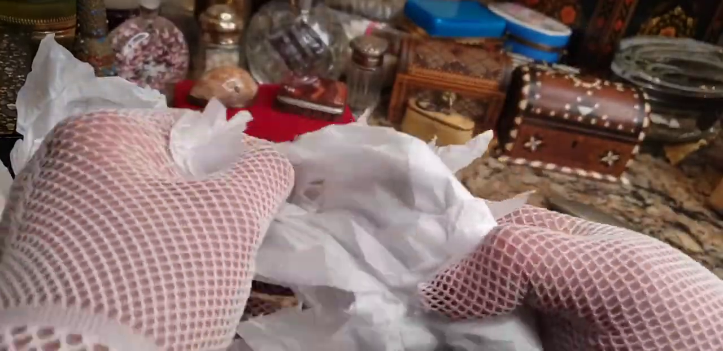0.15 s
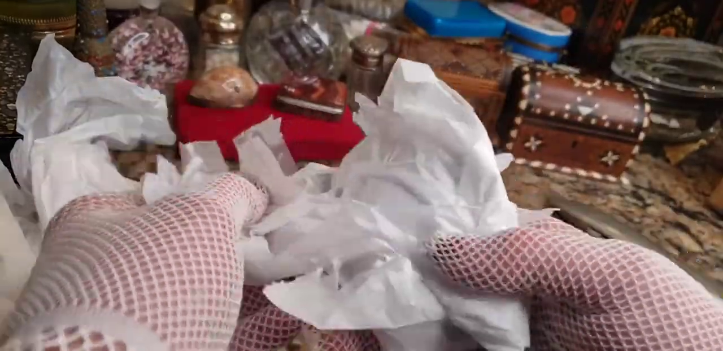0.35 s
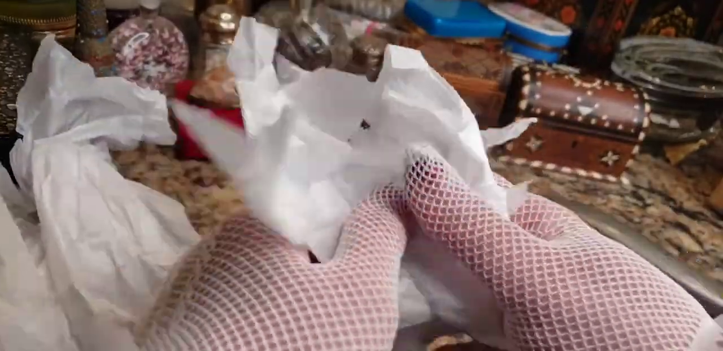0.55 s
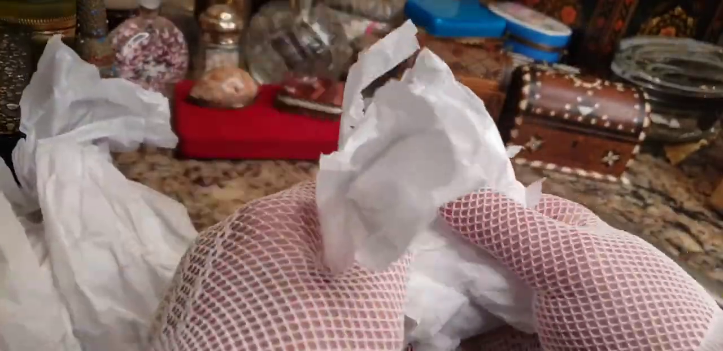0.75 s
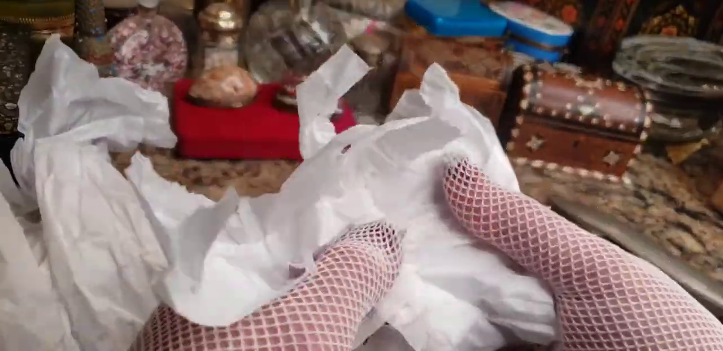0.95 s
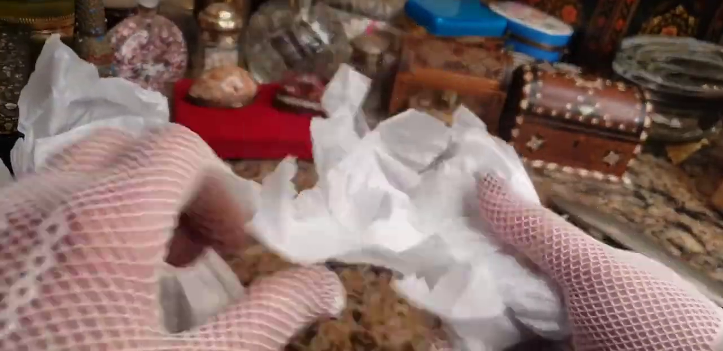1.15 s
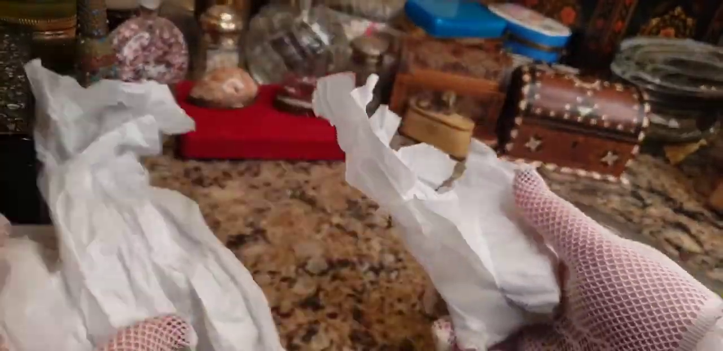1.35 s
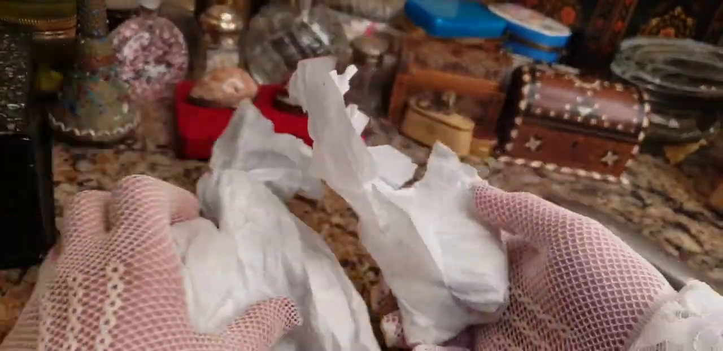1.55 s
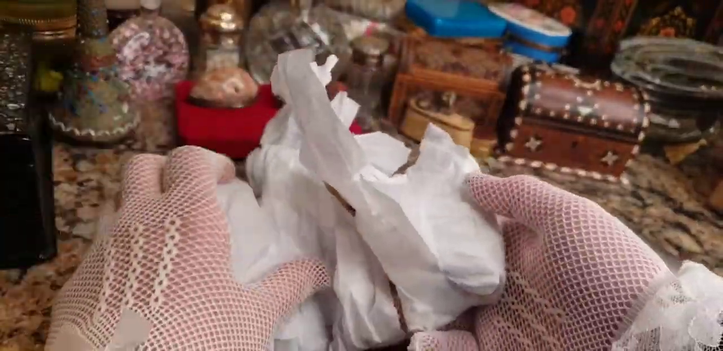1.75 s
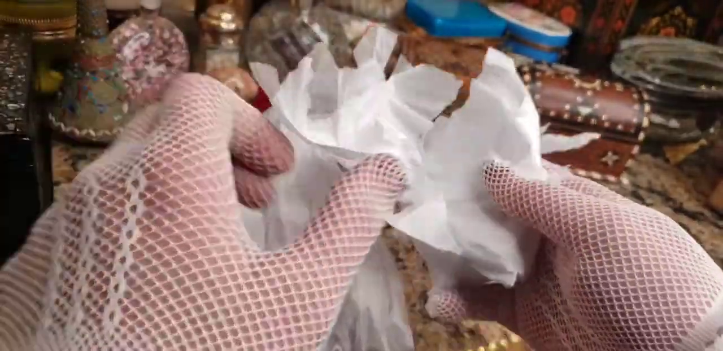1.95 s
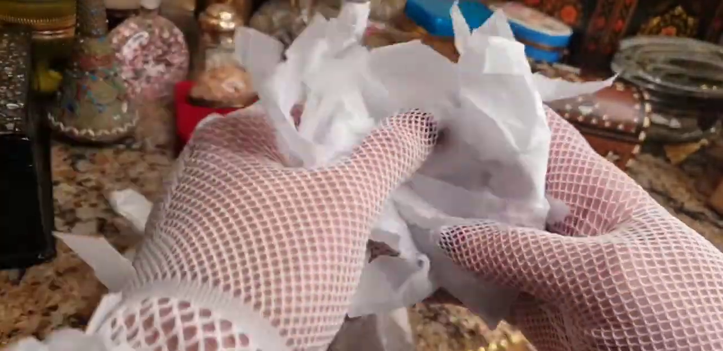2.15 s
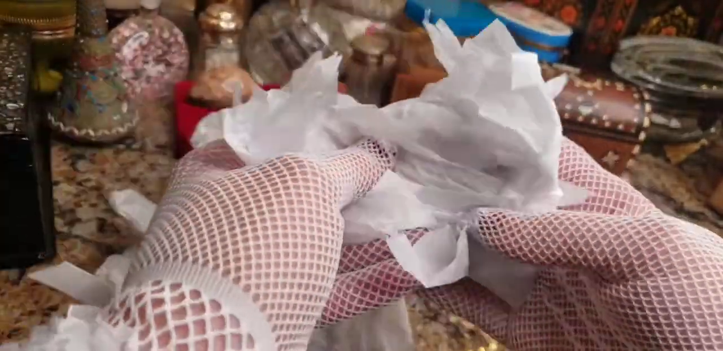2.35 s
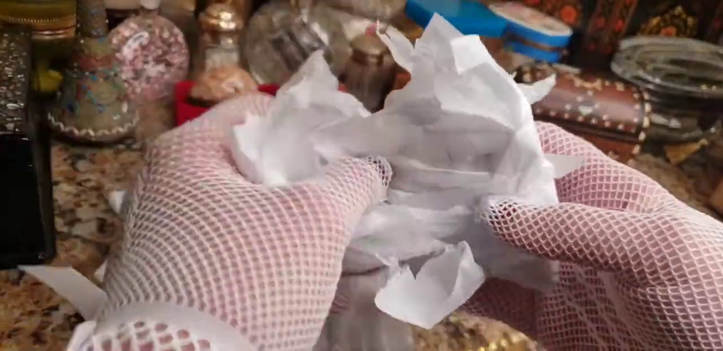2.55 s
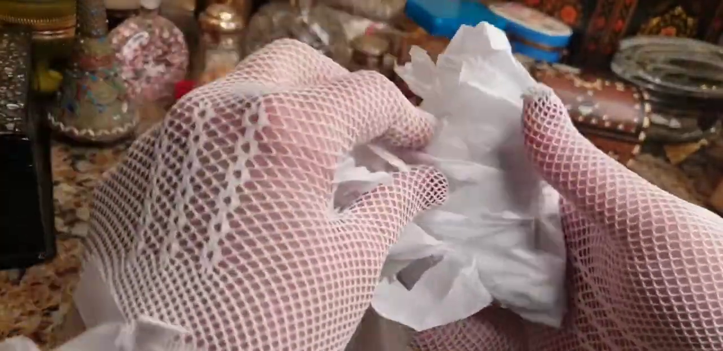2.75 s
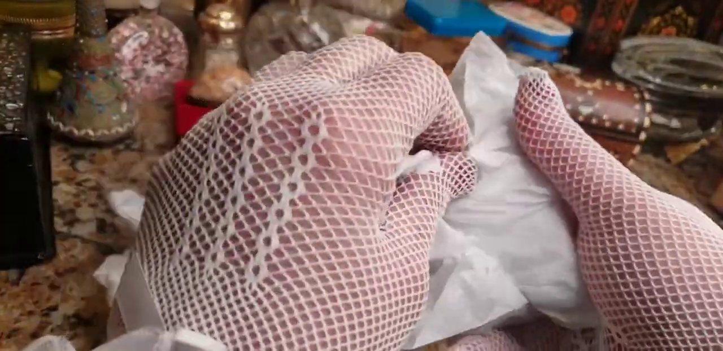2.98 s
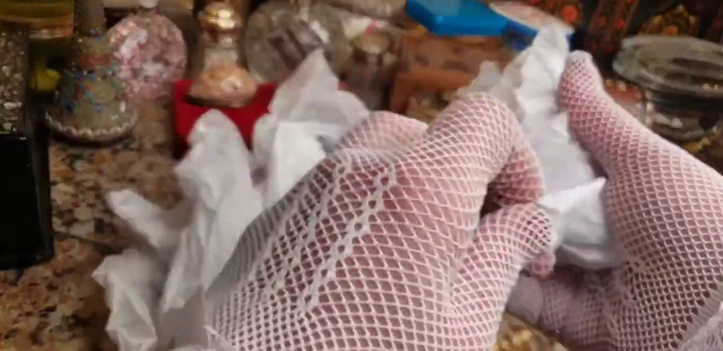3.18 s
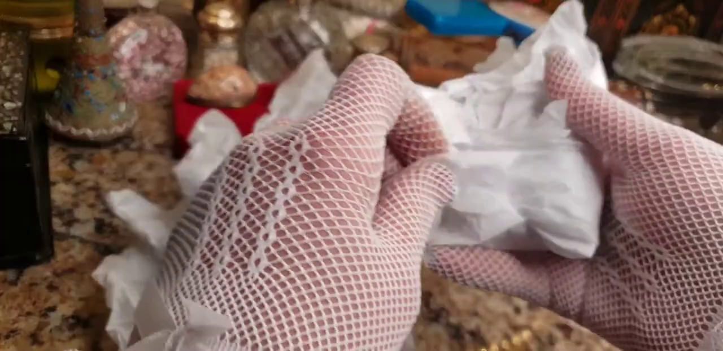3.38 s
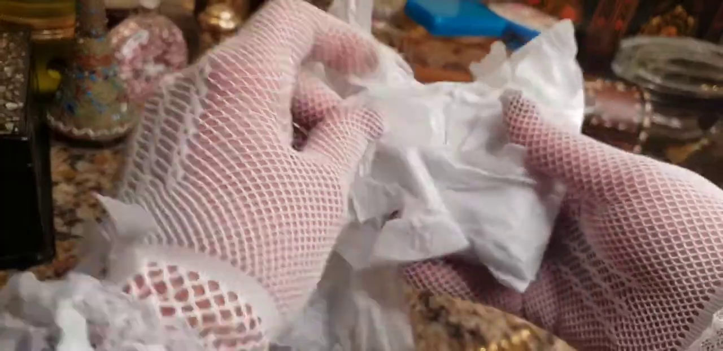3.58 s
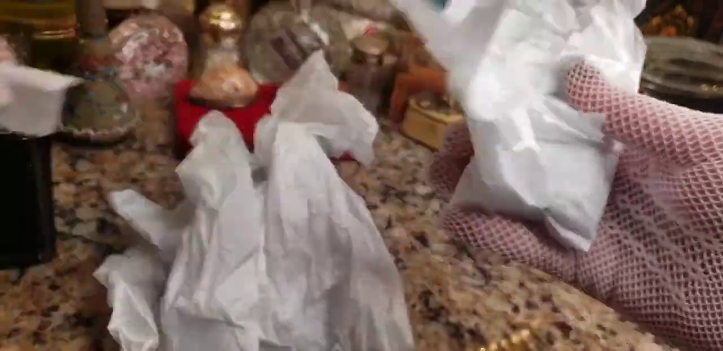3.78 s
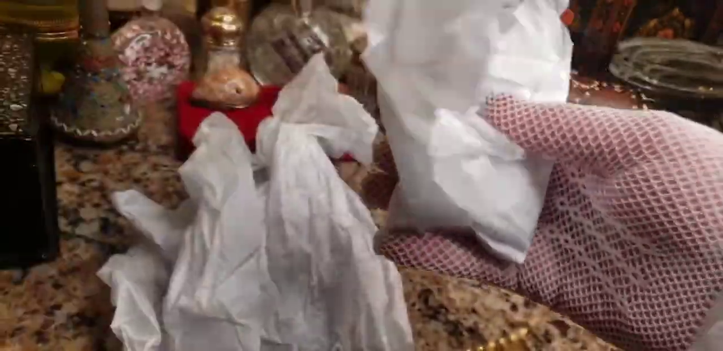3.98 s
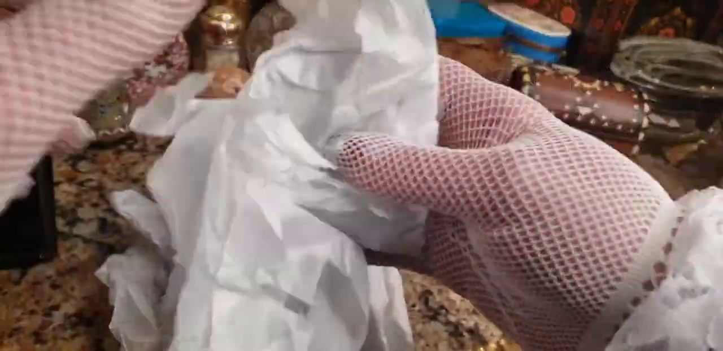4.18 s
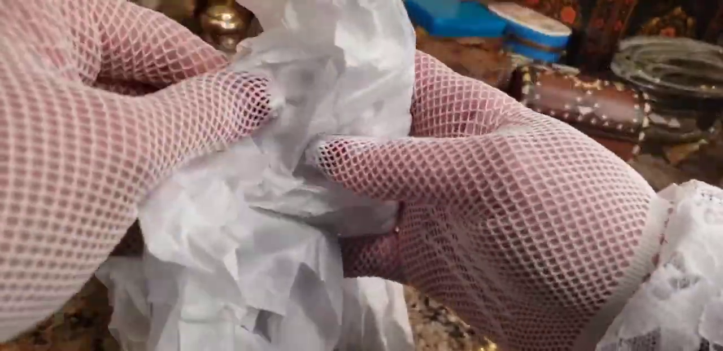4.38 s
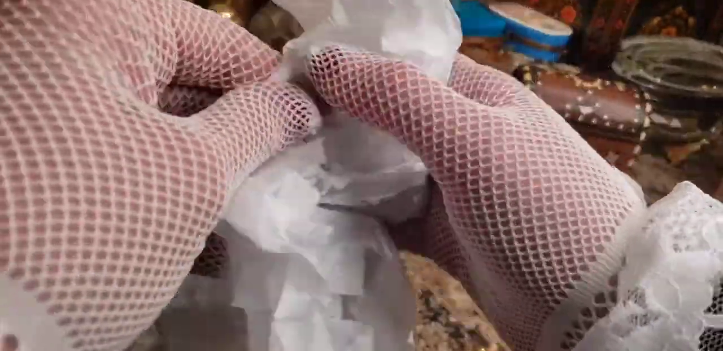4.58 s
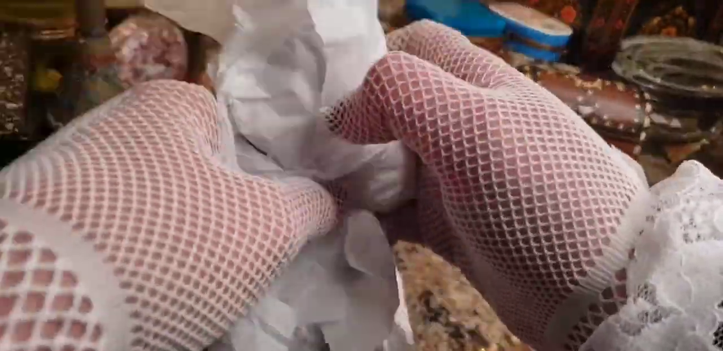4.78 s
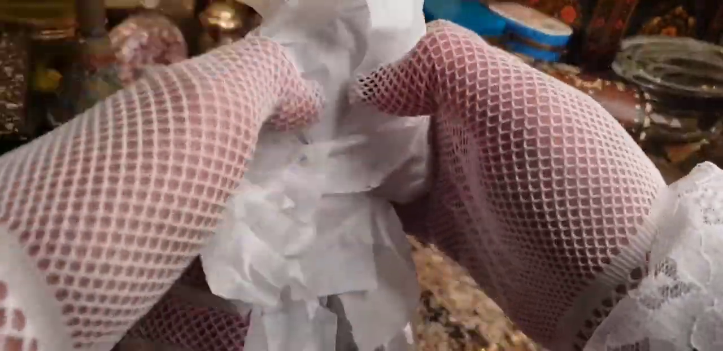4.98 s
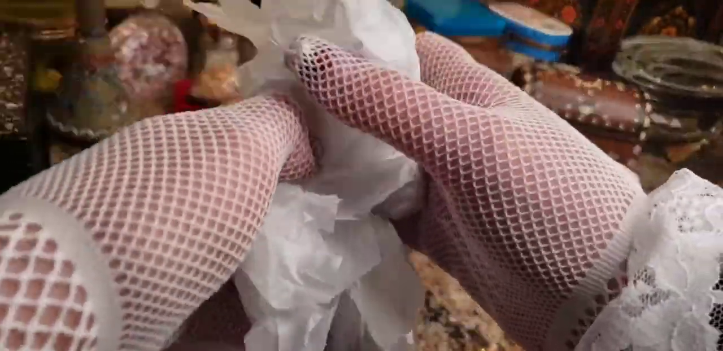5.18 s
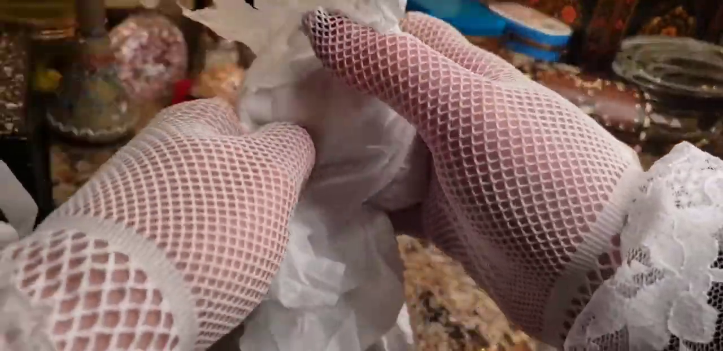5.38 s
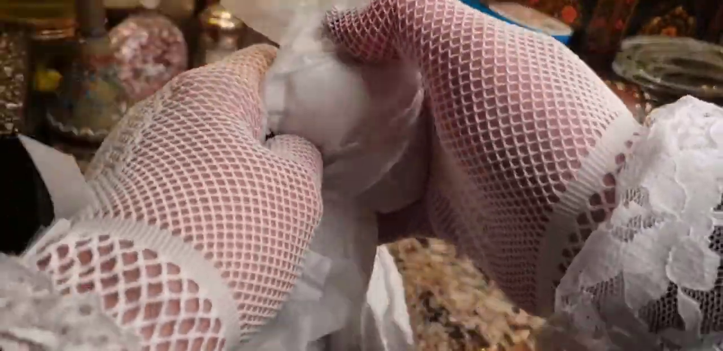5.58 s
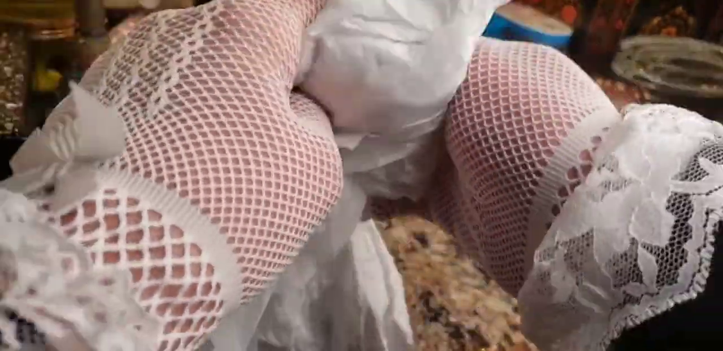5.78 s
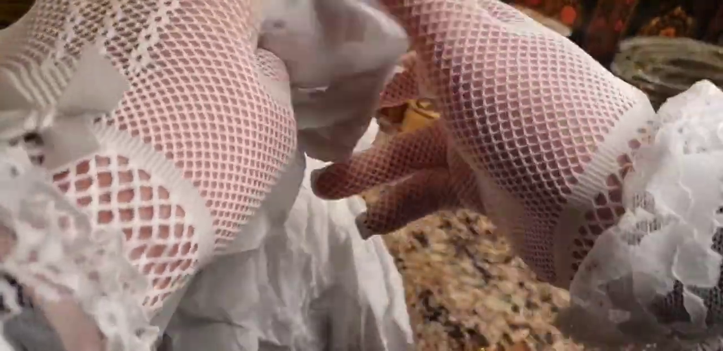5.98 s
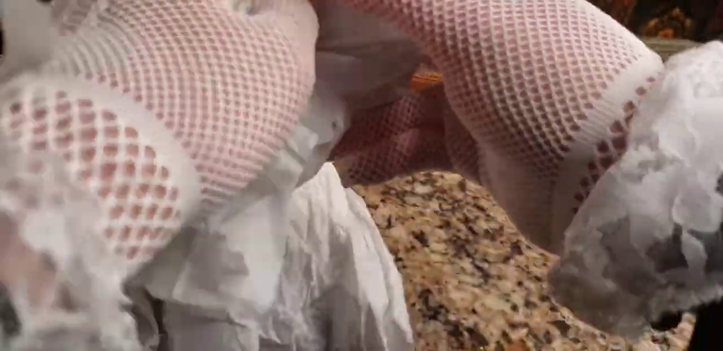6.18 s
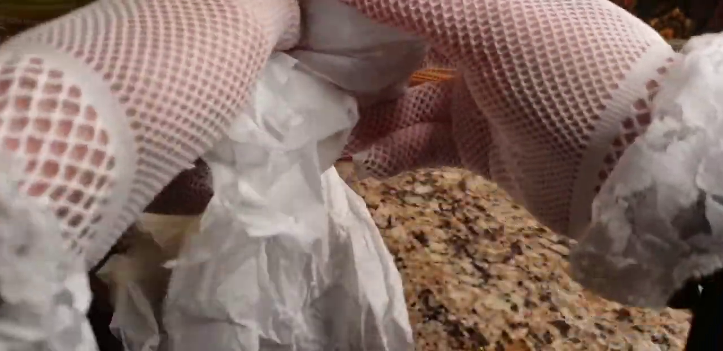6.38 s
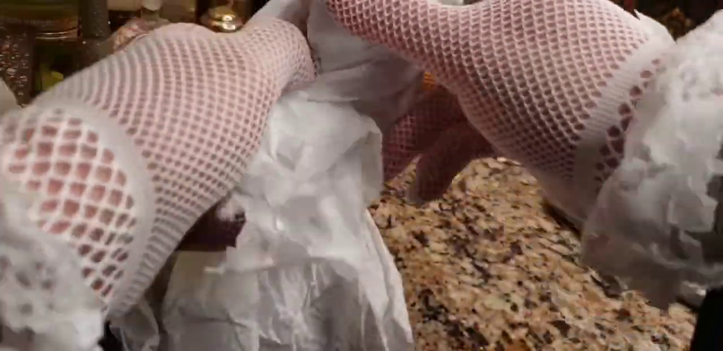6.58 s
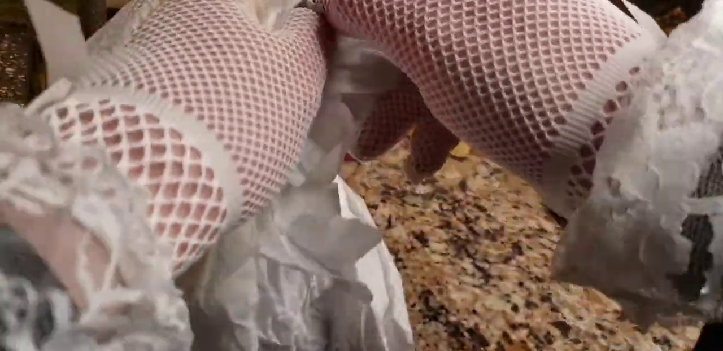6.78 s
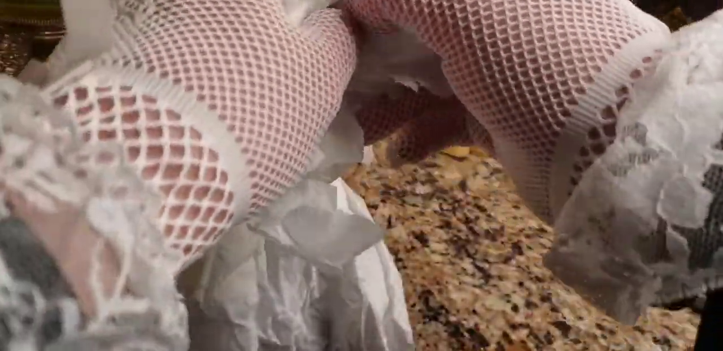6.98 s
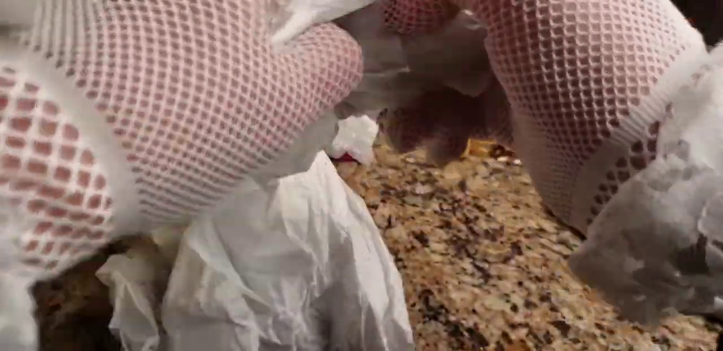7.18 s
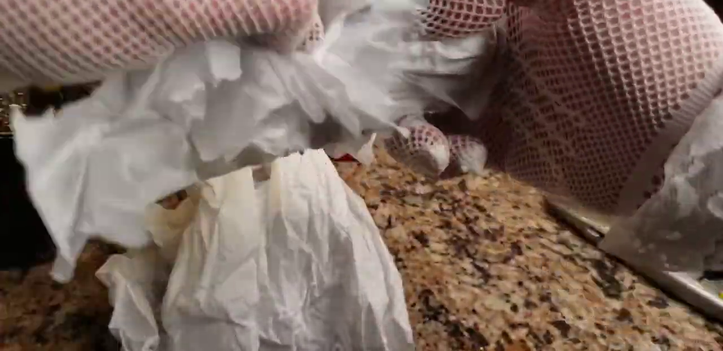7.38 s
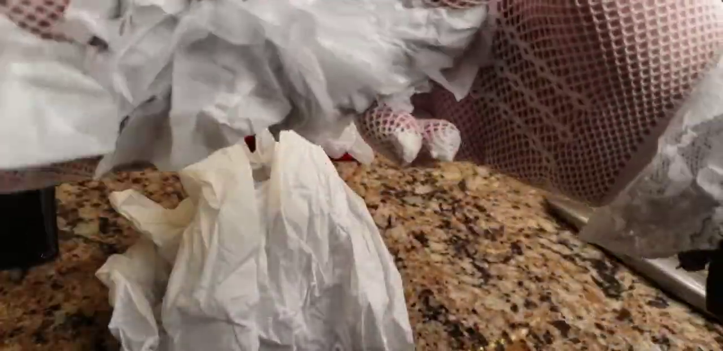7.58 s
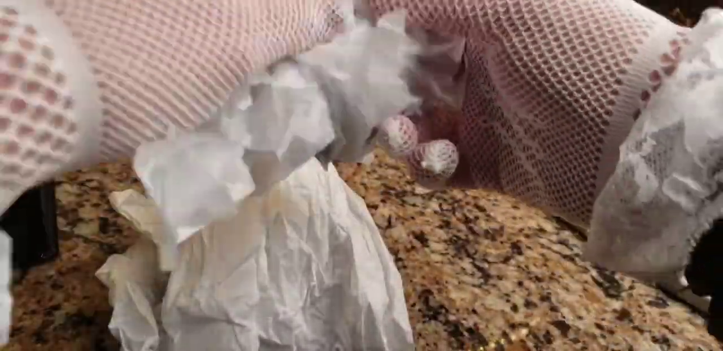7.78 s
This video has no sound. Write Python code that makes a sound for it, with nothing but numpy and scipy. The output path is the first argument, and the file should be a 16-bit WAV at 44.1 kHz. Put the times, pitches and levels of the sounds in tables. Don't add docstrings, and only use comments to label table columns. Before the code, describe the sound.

Hands crumple and tug thin tissue paper right beside a stereo phone microphone in a quiet room. Bright, dense rustling surges and thins with each squeeze, dotted with sharp crackles. A strong scrunch comes a little after three seconds, another near five and a half, and the loudest cluster of snaps arrives at about seven and a half.

```python
import sys
import numpy as np
from scipy import signal
from scipy.fft import rfft, irfft, next_fast_len
from scipy.io import wavfile
from scipy.ndimage import uniform_filter1d

SR = 44100
rng = np.random.default_rng(int(sys.argv[2]) if len(sys.argv) > 2 else 0)


def store_pcm(level_fs):
    pcm = np.round(np.clip(level_fs, -1, 1) * 32767).astype(np.int16)
    wavfile.write(sys.argv[1], SR, np.atleast_2d(pcm).T)


def gain_from_db(level_db):
    decades = np.asarray(level_db, float) / 20
    return 10 ** decades


N = 346185

# (frequency [Hz], density [dB per Hz])
ROOM_SPECTRUM = [(13, -37), (22, -2.5), (124, 11), (151, -8.5), (180, 13), (359, -25), (428, 5), (599, -38),
                 (1280, -30), (1500, 0), (1950, -44), (3300, -120)]
# (frequency [Hz], rms level [dB])
MAINS_HUM = [(59, -76), (120, -76)]
# (frequency [Hz], gain [dB])
LEFT_PORT = [(120, -25.5), (400, -17), (600, -19), (850, -14), (1350, -14), (2200, -12), (3300, -9),
             (4100, -10.5), (5400, -6), (7000, -14), (9000, -21), (11500, -27), (13500, -38.5),
             (15700, -32)]
# (frequency [Hz], gain [dB])
RIGHT_PORT = [(120, -28), (400, -17), (650, -21.5), (1500, -17), (3000, -13.5), (5500, -11.5), (6200, -8),
              (6800, -1), (7500, -5), (8500, -10.5), (10300, -1), (11900, -1.5), (12400, -4.5),
              (15600, -10)]

# (time [s], level [dB], centre [Hz], length [ms])
FLAPS = [(0.179, -44, 306, 20), (.25, -59, 150, 84), (.5, -60, 70, 84), (1.097, -57, 110, 57),
         (2.55, -62, 90, 43), (2.701, -63, 149, 73), (3.631, -52, 130, 45), (3.665, -54, 90, 38),
         (4.76, -57, 120, 60), (5.67, -58, 220, 58), (5.92, -59, 80, 60), (7.049, -60, 80, 60),
         (7.487, -44.5, 330, 14.6)]
# (time [s], level [dB], brightness [dB], left minus right [dB])
SNAPS = [(0.175, -13.4, -6.3, -0.3), (0.1826, -21.3, 5.9, 0.9), (0.787, -23.5, 2.9, 1.6),
         (0.9094, -18.5, -12.2, -4.9), (0.9314, -18.5, -3.8, 0.8), (0.942, -18.0, -7.2, -1.5),
         (2.501, -23.0, -16.8, -11.0), (2.6457, -26.5, -1.7, -7.2), (3.0254, -15.8, 1.1, -17.6),
         (3.0456, -17.9, -3.9, -14.5), (3.1264, -15.3, 1.2, -6.8), (3.1594, -13.2, -9.8, -8.2),
         (4.0207, -26.5, -2.6, -0.5), (4.4927, -22.3, -2.7, -8.9), (4.609, -16.0, -19.4, -4.9),
         (5.5224, -16.3, -8.1, -7.6), (6.067, -27.6, 5.7, -3.0), (6.2168, -24.6, 5.8, -8.6),
         (6.4026, -27.8, -2.7, -4.0), (7.0157, -23.7, 0.1, -9.9), (7.0467, -22.2, -4.1, -3.2),
         (7.1433, -15.0, -5.5, -4.7), (7.1644, -13.1, 0.0, -6.2), (7.4055, -11.4, -8.9, -10.9),
         (7.474, -8.7, -6.7, -7.9), (7.5222, -9.7, -5.9, 1.4), (7.538, -7.9, 2.2, -6.3),
         (7.5514, -11.6, -6.3, -2.3), (7.5717, -7.5, -6.4, -2.2), (7.588, -12.9, -8.3, -2.6)]
# (time [s], level [dB])
TICKS = [(0.3245, -29.8), (0.5044, -31.6), (0.7364, -18.8), (0.7546, -18.0), (0.8063, -22.7),
         (0.8397, -28.9), (0.9527, -21.9), (1.0233, -29.1), (1.4217, -28.4), (1.9951, -37.0),
         (2.0463, -35.8), (2.788, -20.0), (2.8299, -23.3), (3.7733, -30.0), (3.829, -31.0), (3.9237, -35.1),
         (4.1516, -37.4), (4.522, -29.2), (4.821, -29.3), (5.1564, -26.2), (5.1992, -22.4), (5.8878, -31.9),
         (5.923, -27.6), (6.3303, -30.0), (6.6763, -23.9), (6.8048, -25.7), (7.065, -21.8), (7.3571, -20.3),
         (7.43, -14.7), (7.5956, -12.6)]

BAND_HZ = [350, 950, 1450, 2400, 3800, 5800, 9000, 13000]
RANGE_OF_BAND = np.array([0, 1, 1, 1, 2, 2, 3, 3])
RANGE_DB = [-22.8, -10.5, -1.2, 1.5]
HEFT_SHARE = [3.18, 1.01, .01, -.01]
FULL_SHARE = np.array([0, 0, 0, 1, .5, 0, 0, 0])

# (time [s], left minus right [dB], cupping of the hands [dB], brightness [dB], fullness [dB])
WAD = [(0.0, 7.6, -5.4, 2.9, 0.8), (0.6, 4.9, -11.5, -0.4, 3.2), (1.15, 4.0, -15.9, 0.0, 0.6),
       (1.6, 4.9, -2.9, -1.8, -3.4), (2.0, 1.9, -7.7, 0.5, -0.6), (2.3, 3.5, -1.1, 1.5, 1.4),
       (2.7, 3.7, -10.5, 0.3, 0.8), (3.12, -0.5, -11.3, -2.6, 0.2), (3.5, 3.1, -13.3, -0.2, 1.0),
       (3.9, 1.7, -11.6, 0.7, 1.7), (4.3, 7.0, -7.6, 1.4, 1.1), (4.9, 7.1, -3.5, 2.7, -1.2),
       (5.6, 6.5, -9.1, 0.9, -0.1), (6.0, 6.8, -11.0, 2.4, -0.5), (6.5, 6.5, -12.7, 2.0, -0.1),
       (7.15, 3.0, 1.0, -1.1, -0.1), (7.45, 6.8, -16.2, 1.3, -1.1), (7.85, 4.6, -9.1, 0.9, -2.5)]
# (start [s], level [dB], fade [s per 10 dB], heft [dB])
SQUEEZES = [(0.182, -35.2, 0.177, 0.1), (0.36, -38.7, 0.064, -0.6), (0.615, -35.5, 0.239, 0.1),
            (0.942, -40.8, 0.019, 1.8), (1.058, -38.5, 0.175, 1.3), (1.358, -39.5, 0.221, -2.7),
            (1.48, -41.3, 0.195, 2.3), (1.781, -44.7, 0.164, 1.9), (2.232, -39.2, 0.039, 2.7),
            (2.309, -36.4, 0.056, -0.5), (2.651, -41.9, 0.161, -1.7), (2.782, -40.2, 0.022, -1.0),
            (3.081, -22.3, 0.088, -0.1), (3.366, -37.2, 0.17, 0.7), (3.598, -36.7, 0.065, 1.0),
            (3.758, -44.0, 0.042, -2.4), (3.837, -45.2, 0.027, -0.5), (4.359, -41.5, 0.254, 0.2),
            (4.597, -41.8, 0.047, -2.4), (4.736, -38.6, 0.435, 1.8), (5.051, -45.0, 0.03, 2.4),
            (5.212, -35.6, 0.022, 1.3), (5.626, -26.8, 0.065, 1.1), (6.179, -35.2, 0.049, 0.9),
            (6.608, -34.8, 0.057, 1.1), (6.733, -40.9, 0.028, -0.2), (7.143, -29.2, 0.173, -2.7),
            (7.518, -29.0, 0.074, -1.3), (7.658, -30.4, 0.107, 0.7), (7.835, -35.4, 0.31, 1.4)]
# (end [s], level [dB], swell [s per 10 dB], heft [dB])
PULLS = [(0.109, -28.8, 0.48, 0.5), (0.261, -30.6, 0.18, 1.1), (0.437, -44.0, 0.171, -0.2),
         (0.612, -34.9, 0.144, 1.2), (0.792, -49.7, 0.044, -1.3), (0.931, -37.2, 0.269, -0.5),
         (1.09, -35.0, 0.026, -0.3), (1.453, -42.8, 0.053, 3.6), (1.703, -43.4, 0.021, 2.5),
         (1.804, -44.0, 0.147, 2.2), (2.217, -34.1, 0.075, 0.6), (2.417, -35.8, 0.101, 0.1),
         (2.59, -33.2, 0.1, -1.2), (3.059, -31.3, 0.331, 0.7), (3.34, -39.3, 0.031, 1.0),
         (3.586, -36.9, 0.187, -0.6), (4.023, -44.4, 0.023, -1.6), (4.319, -42.2, 0.159, 0.7),
         (4.688, -38.8, 0.196, 0.8), (4.795, -38.3, 0.088, -3.5), (5.173, -42.2, 0.137, -6.3),
         (5.418, -37.6, 0.054, 1.5), (5.577, -30.3, 0.228, -0.5), (6.009, -41.6, 0.744, 0.5),
         (6.156, -37.5, 0.044, 2.0), (6.584, -38.1, 0.539, 0.2), (6.889, -35.2, 0.089, -0.2),
         (7.092, -31.5, 0.189, -1.8), (7.446, -30.2, 0.144, -5.6), (7.483, -32.2, 0.448, -0.6)]
# (start [s], level [dB], fade [s per 10 dB], heft [dB])
RIPS = [(0.526, -35.0, 0.053, 0.1), (1.33, -41.1, 0.095, 2.1), (2.045, -48.7, 0.228, -1.7),
        (2.716, -35.6, 0.058, -0.3), (3.043, -35.8, 0.062, -0.1), (3.921, -48.7, 0.027, -0.6),
        (3.97, -47.4, 0.023, 0.5), (4.26, -50.9, 0.042, -2.5), (4.489, -39.4, 0.029, -2.0),
        (6.025, -28.5, 0.031, -1.1), (7.159, -27.2, 0.063, -4.5)]

CREASES_PER_S = 6000
TICK_NEUTRAL_DB, TICK_BRIGHT_PER_DB, TICK_PAN_DB = -28, -.4, -3
HOLLOW_HZ, HOLLOW_WIDTH_HZ = 1427, 280
GRAB_S, LET_GO_S, RIP_EDGE_S = .035, .022, .004
HOLD_S, RIP_HOLD_S = .045, .008


def level(x, db):
    return x * gain_from_db(db) / np.sqrt(np.mean(x ** 2))


def on_log_axis(points, size):
    hz, value = np.transpose(points)
    return np.interp(np.log(np.fft.rfftfreq(size, 1 / SR) + 1), np.log(hz), value)


def response(points, size=1024):
    cepstrum = irfft(np.log(gain_from_db(on_log_axis(points, size))))
    cepstrum[1:size // 2] *= 2
    cepstrum[size // 2 + 1:] = 0
    return irfft(np.exp(rfft(cepstrum)))


def walk(rate):
    hold = int(SR / rate)
    steps = np.repeat(rng.standard_normal(N // hold + 1), hold)
    return 1.57 * uniform_filter1d(uniform_filter1d(steps, hold), hold)[:N]


def curves(table):
    times, *columns = np.transpose(table)
    return [np.interp(np.arange(N) / SR, times, column) for column in columns]


def paths():
    return np.array([response(LEFT_PORT), response(RIGHT_PORT)])


def room(path, side_db=-8, hiss_db=-58):
    noise = rfft(rng.standard_normal((2, N)))
    mid, side = irfft(noise * gain_from_db(on_log_axis(ROOM_SPECTRUM, N)), N)
    rumble = mid + gain_from_db(side_db) * side * np.array([[1], [-1]])
    rumble = level(rumble, -66.5) * gain_from_db(0.4 * walk(2.42))
    t = np.arange(N) / SR
    hum = sum(np.sqrt(2) * gain_from_db(db) * np.sin(2 * np.pi * hz * t) for hz, db in MAINS_HUM)
    hiss = signal.fftconvolve(rng.standard_normal((2, N)), path, axes=1)[:, :N]
    return rumble + hum + level(hiss, hiss_db)


def flaps():
    out = np.zeros(N)
    for s, db, hz, ms in FLAPS:
        size = int(ms / 1000 * SR)
        band = signal.butter(2, [hz / 2.6, hz * 2.4], "band", fs=SR, output="sos")
        puff = signal.sosfilt(band, rng.standard_normal(8192))[-size:]
        start = int(s * SR) - size // 2
        out[start:start + size] += level(puff * np.hanning(size), db)
    return out


def creases(s, size, band_db, pan_db, lag, path):
    size_fft = next_fast_len(N + 4096)
    shapes = [on_log_axis(list(zip(BAND_HZ, row)), size_fft) for row in np.eye(len(BAND_HZ))]
    out = np.empty((len(BAND_HZ), 2, N))
    for port, side in enumerate((1, -1)):
        at = np.clip(s * SR + port * lag, 0, N - 1).astype(int)
        heard = rfft(path[port], size_fft).astype(np.complex64)
        for band, shape in enumerate(shapes):
            strength = size * gain_from_db(band_db[:, band] + side * pan_db / 2)
            clicks = np.bincount(at, strength, N).astype(np.float32)
            spectrum = rfft(clicks, size_fft) * heard * shape.astype(np.float32)
            out[band, port] = irfft(spectrum, size_fft)[:N]
    return out


def snaps(path, gain_db=10.5, after_db=-3, length_ms=.9, lag=7, colour_db=1.5, count=10):
    ticks = [(s, db, TICK_BRIGHT_PER_DB * (db - TICK_NEUTRAL_DB), TICK_PAN_DB) for s, db in TICKS]
    rows = list(SNAPS) + ticks
    s, db, bright, pan = (np.repeat(column, count) for column in np.transpose(rows))
    chance = rng.random((len(s), 4))
    later = (np.arange(len(s)) % count > 0) * chance[:, 0] * 2.5
    size = gain_from_db(db + after_db * (later > 0)) * np.exp(-later) * np.where(chance[:, 1] > .5, 1, -1)
    band_db = np.array([-17, -11, -8, -1.5, -4.5, 3.5, -1.5, -1])
    band_db = band_db + np.outer(bright, np.equal(RANGE_OF_BAND, RANGE_OF_BAND[-1]))
    band_db += colour_db * np.repeat(rng.standard_normal((len(rows), len(BAND_HZ))), count, axis=0)
    lags = lag + 12 * (chance[:, 2] - .5) * (later > 0)
    sides = pan + 3 + 9 * (chance[:, 3] - .5) * (later > 0)
    heard = creases(s + later * length_ms / 1000, size, band_db, sides, lags, path).sum(axis=0)
    return heard * gain_from_db(gain_db) / np.sqrt(np.sum(path[0] ** 2))


def effort(heft_share):
    t = np.arange(0, N, 64) / SR
    power = 1e-9
    gestures = ((SQUEEZES, 1, GRAB_S, HOLD_S),
                (PULLS, -1, LET_GO_S, HOLD_S),
                (RIPS, 1, RIP_EDGE_S, RIP_HOLD_S))
    for rows, way, edge_s, hold_s in gestures:
        s, db, slope_s, heft = np.transpose(rows)[:, :, None]
        inside = way * (t - s)
        drop = np.maximum(np.maximum(inside - hold_s, 0) / slope_s, -inside / edge_s)
        power = power + np.sum(gain_from_db(db + heft_share * heft - 10 * drop) ** 2, axis=0)
    return np.interp(np.arange(N) / SR, t, 10 * np.log10(power))


def hollow(paper, share_db=-12):
    ring = signal.lfilter(*signal.iirpeak(HOLLOW_HZ, HOLLOW_HZ / HOLLOW_WIDTH_HZ, SR), paper)
    slow = np.sqrt(uniform_filter1d(ring.mean(axis=0) ** 2, SR // 10) + 1e-12)
    cupping = curves(WAD)[1]
    return ring / slow * gain_from_db(effort(HEFT_SHARE[1]) + cupping + share_db)


def flurries(rate, fade_ms, depth):
    starts = (rng.random(N) < rate / SR) * np.minimum(rng.exponential(size=N), 2)
    decay = np.exp(-1000 / (fade_ms * SR))
    activity = 1 + depth * signal.lfilter([1], [1, -decay], starts)
    return 20 * np.log10(activity / np.sqrt(np.mean(activity ** 2)))


def rustle(path, size_db=1.5, colour_db=4, place_db=4.5, lag=5, spread=3.3, echo_db=-5, echo_ms=1.2,
           patch_db=1.16):
    count = int(CREASES_PER_S * N / SR)
    delay = echo_ms / 1000 * rng.exponential(size=(3, count)) * [[0], [1], [1]]
    s = rng.random(count) * N / SR + delay
    size = gain_from_db(size_db * np.minimum(rng.exponential(size=count), 4.5)) * rng.choice([-1, 1], (3, count))
    size[1:] *= gain_from_db(echo_db)
    colour = np.tile(colour_db * rng.standard_normal((count, len(BAND_HZ))), (3, 1))
    place = rng.standard_normal((2, 3 * count))
    lags = lag + spread * place[1]
    bands = creases(s.ravel(), size.ravel(), colour, place_db * place[0], lags, path)
    pan, _, bright, full = curves(WAD)
    body, middle, main, top = (effort(share) + db for share, db in zip(HEFT_SHARE, RANGE_DB))
    out = 0
    for k, db in enumerate((body, middle, main, top + bright)):
        part = sum(bands[b] * gain_from_db(patch_db * walk(9) + FULL_SHARE[b] * full)
                   for b in np.flatnonzero(np.equal(RANGE_OF_BAND, k)))
        out = out + part * gain_from_db(db) / np.sqrt(np.mean(part.mean(axis=0) ** 2))
    balance = np.array([[.5], [-.5]]) * (pan - np.mean(pan))
    return out * gain_from_db(flurries(rate=70, fade_ms=14.6, depth=0.23) + balance)


def scene():
    path = paths()
    paper = rustle(path)
    return room(path) + flaps() + snaps(path) + hollow(paper) + paper


def low_pass(x):
    return signal.sosfilt(signal.butter(12, 15830, fs=SR, output="sos"), x)


def record(dry):
    cut = signal.sosfilt(signal.butter(2, 45, "high", fs=SR, output="sos"), dry)
    rounded = np.tanh(1.3 * cut) / 1.3
    dull = signal.sosfilt(signal.ellip(8, .2, 60, 15650, fs=SR, output="sos"), rounded)
    return low_pass(dull)


dry = scene()
out = record(dry)
store_pcm(out)
```